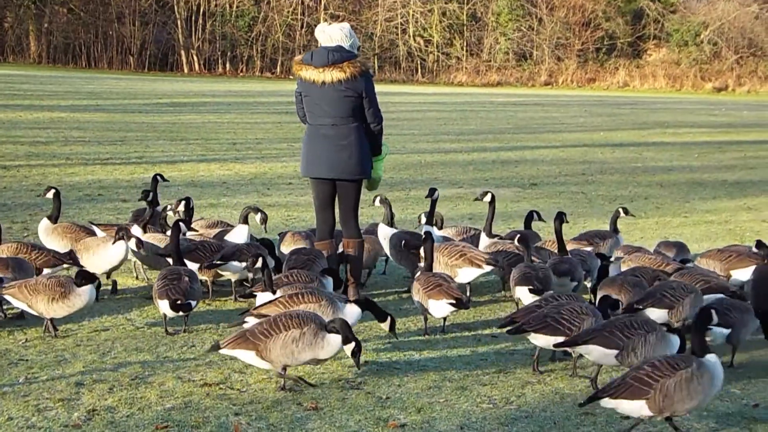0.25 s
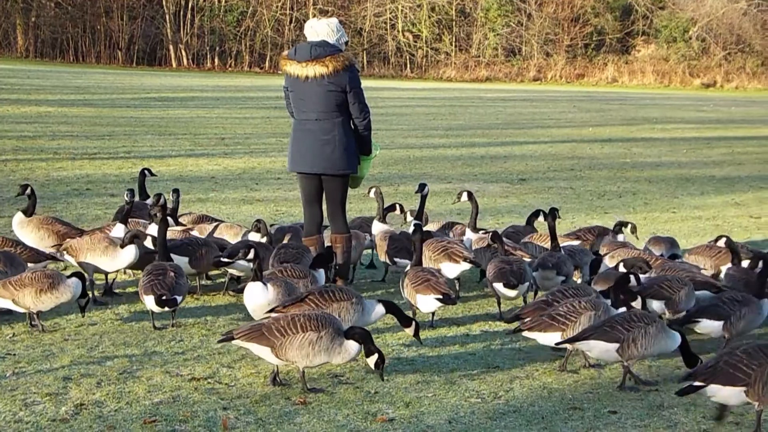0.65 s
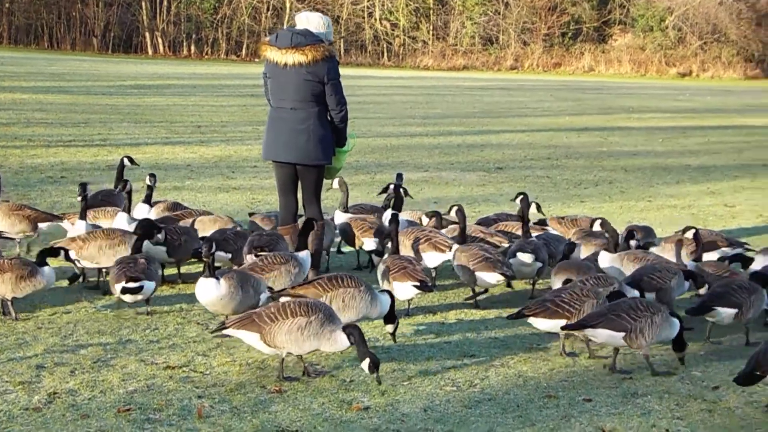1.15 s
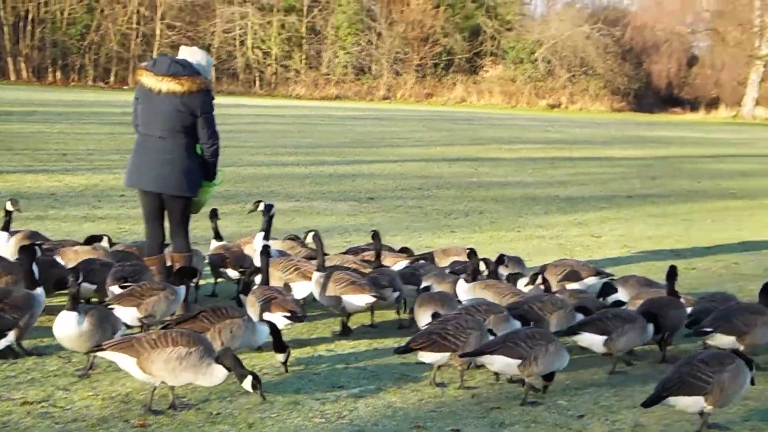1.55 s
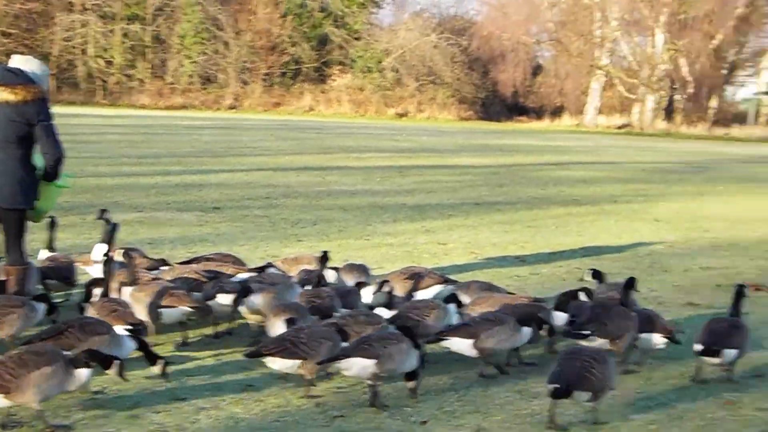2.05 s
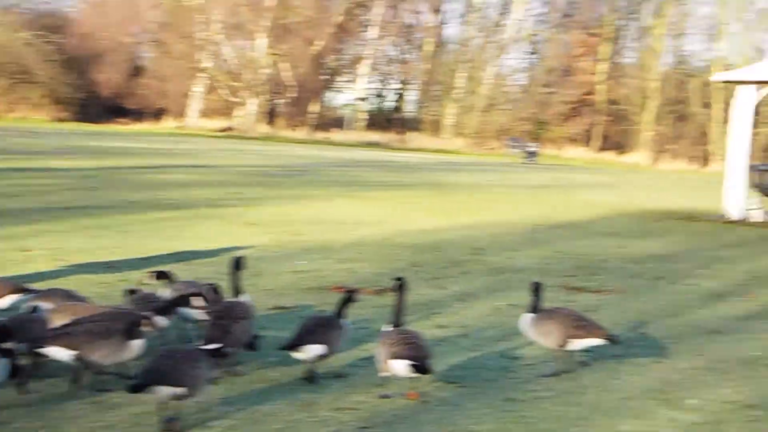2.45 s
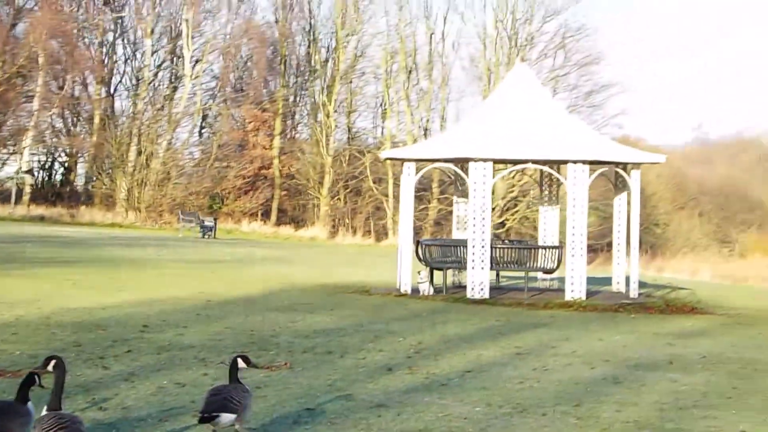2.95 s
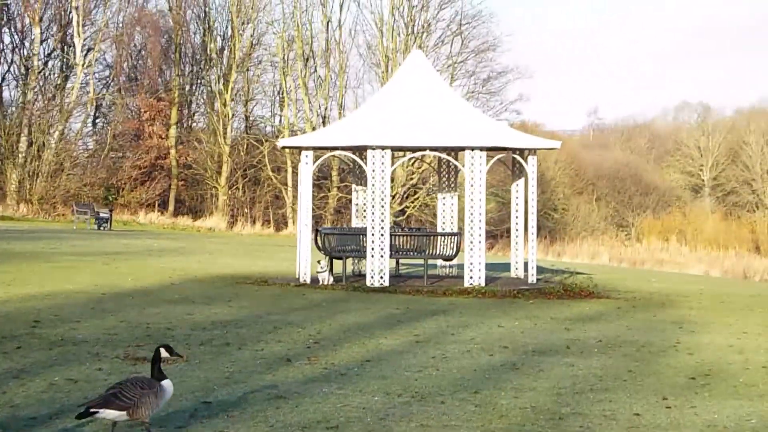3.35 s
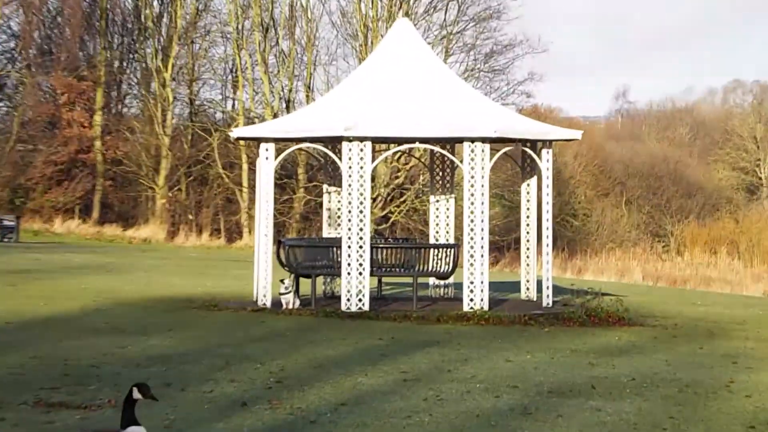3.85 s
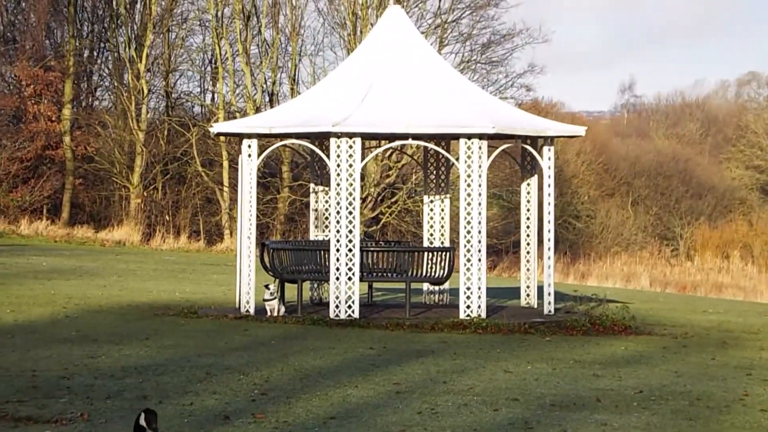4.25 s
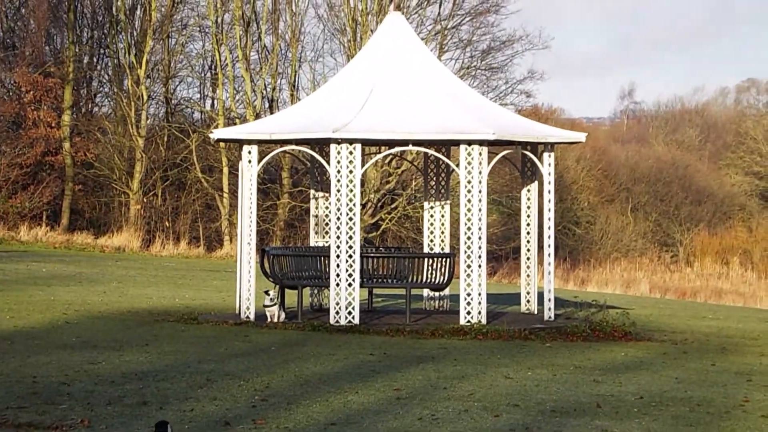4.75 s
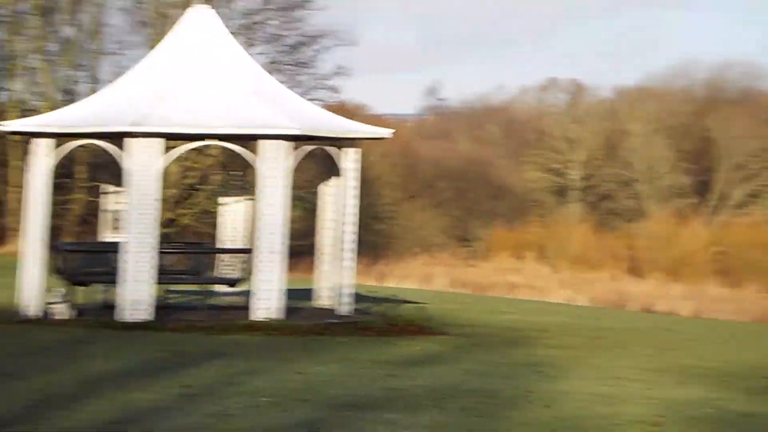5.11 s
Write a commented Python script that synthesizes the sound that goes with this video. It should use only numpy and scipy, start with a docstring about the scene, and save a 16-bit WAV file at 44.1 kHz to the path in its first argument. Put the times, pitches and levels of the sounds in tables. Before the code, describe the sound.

An open lawn with geese close to a handheld camera. Soft crunches and bright ticks come from feet and bills in frosty grass. One bird gives a growling honk, then two rougher honks follow close together, with a faint echo from trees. The crunching stops, a hard click starts a thin lens motor whir, more clicks end it, and only distant traffic and hiss remain.

```python
"""Geese graze on an open lawn: three times a bird growls up into a short, cracked honk, echoed faintly.
Each voice is a rattle of pulses and a sung tone, both ringing a long throat. Bills and feet tick and
crunch in frosty grass, as struck resonances and spiky noise, over coloured noise for distant traffic and hiss.
A camera's zoom lever clicks and its lens motor whirs for half a second as noise ringing the lens barrel,
while the background dips; a thin rustle comes and goes on top."""
import sys
import numpy as np
from scipy import signal
from scipy.fft import rfft, irfft, next_fast_len
from scipy.io import wavfile

SR = 44100
rng = np.random.default_rng(int(sys.argv[2]) if len(sys.argv) > 2 else 0)


def bounce(signal):
    """Save signal as a 16-bit WAV file at the path given by the first command-line argument."""
    frames = np.transpose(np.atleast_2d(signal))
    limited = np.clip(frames, -1, 1)
    pcm = np.round(limited * 32767).astype(np.int16)
    wavfile.write(sys.argv[1], SR, pcm)


N = 237147
TIME = np.arange(N) / SR
FREQ = np.maximum(np.arange(N // 2 + 1) * SR / N, 1)


def undb(db):
    """Decibels to gain."""
    return 10 ** (np.asarray(db) / 20)


def unit(x):
    """Scale to rms 1."""
    return x / np.sqrt(np.mean(x ** 2) + 1e-18)


def colour(points, hz=FREQ):
    """Gain of a spectrum drawn through (freq_hz, level_db) points on a log frequency axis."""
    f, db = np.transpose(points)
    return undb(np.interp(np.log(hz), np.log(f), db))


def resonances(modes, hz, order=1):
    """Complex response of parallel resonances of alternating sign; order 2 has steep skirts."""
    total = 0
    for k, (f, width, db) in enumerate(modes):
        detuning = (hz / f - f / hz) * f / width
        total = total + (-1) ** k * undb(db) / (1 + 1j * detuning) ** order
    return total


def filtered(x, response):
    """Pass a sound through a response given as a function of frequency."""
    size = next_fast_len(x.shape[-1] + 2048)  # spare room for the ring-out
    hz = np.maximum(np.arange(size // 2 + 1) * SR / size, 1)
    return irfft(rfft(x, size) * response(hz), size)[..., :x.shape[-1]]


def walk(rate_hz, size=N):
    """Smooth random wander of rms 1, with little movement faster than the rate."""
    return unit(filtered(rng.standard_normal(size), lambda hz: np.exp(-(hz / rate_hz) ** 2)))


def held(t, start, length, attack, release):
    """Envelope in dB: a rise up to the start, a hold at 0, a fall; attack and release each span 60 dB."""
    before = np.maximum(start - t, 0)
    after = np.maximum(t - start - length, 0)
    return -60 * (before / attack + after / release)


def add(out, start, sound):
    """Mix a sound in at a time."""
    i = int(start * SR)
    out[:, i:i + sound.shape[-1]] += sound[..., :N - i]


# stereo spread of noise beds: freq_hz, side_minus_mid_db
WIDTH = [(40, -15), (120, -16.5), (300, -24.5), (1200, -19), (2400, -13.5), (4400, -9), (8000, -3.5),
         (13000, -48)]


def wash(response, width=WIDTH):
    """Stereo noise of a given colour; independent side noise sets how wide each band sounds."""
    mid = filtered(rng.standard_normal(N), response)
    side = filtered(rng.standard_normal(N), lambda hz: response(hz) * colour(width, hz))
    return unit(np.array([mid + side, mid - side]))


# colour of far tyre noise: freq_hz, level_db
TRAFFIC = [(180, -59), (300, -16), (336, -10), (372, -14.5), (467, -12.5), (585, -9.5), (734, -3.5),
           (1010, 0), (1550, -3.5), (1860, -5), (2550, -8.5), (3240, -13.5), (4500, -20.5), (5850, -26),
           (9900, -120)]
# colour of low road rumble: freq_hz, level_db
RUMBLE = [(20, -44), (50, -10.5), (100, -7), (180, 0), (300, -1.5), (450, -12), (800, -51)]
# colour of the fine hiss: freq_hz, level_db
HISS = [(2000, -15), (3500, -4), (5300, 4), (6600, -2.5), (8000, -12.5), (10000, -19.5), (13000, -22),
        (16000, -26)]
# levels at the start, and their growth as the traffic draws nearer
TRAFFIC_DB, TRAFFIC_DB_PER_S = -42, 0.58
RUMBLE_DB, RUMBLE_DB_PER_S = -61, 0.75
DRONE_DB, DRONE_DB_PER_S = -71, 3
HISS_DB = -48.5
DIP_START_S, DIP_LENGTH_S, DIP_EDGE_S, DIP_DB = 3.437, .856, .015, -3


def background():
    """Noise for far tyres and rumble and a narrow engine drone swell over a fine hiss; all dips once."""
    traffic_db = TRAFFIC_DB + TRAFFIC_DB_PER_S * TIME + 0.43 * walk(26)
    traffic = wash(lambda hz: colour(TRAFFIC, hz)) * undb(traffic_db)
    rumble = wash(lambda hz: colour(RUMBLE, hz)) * undb(RUMBLE_DB + RUMBLE_DB_PER_S * TIME)
    drone = wash(lambda hz: resonances([(247.9, 34, 0)], hz, order=2))
    drone = drone * undb(DRONE_DB + DRONE_DB_PER_S * TIME)
    hiss = wash(lambda hz: colour(HISS, hz)) * undb(HISS_DB + .5 * walk(18))
    dip = undb(held(TIME, DIP_START_S, DIP_LENGTH_S, DIP_EDGE_S, DIP_EDGE_S))  # 0 to 1
    return (traffic + rumble + drone + hiss) * undb(DIP_DB * dip)


def feet(count=60, step_db=-47, spread_db=3, crunch_s=0.042):
    """Webbed feet crush frost at random moments early on; cubed noise makes spiky, crystalline crunches."""
    out = np.zeros((2, N))
    t = TIME[:SR // 10]
    for when, size, pan in rng.random((count, 3)):
        crystals = rng.standard_normal(len(t)) ** 3 * np.exp(-t / crunch_s) / 20
        level_db = step_db - spread_db * np.log(1 - size)  # mostly soft, a few heavy
        add(out, 3.3 * when, undb(level_db) * np.outer([.5 + pan, 1.5 - pan], crystals))
    return filtered(out, lambda hz: 1 / (1 + (3500 / hz) ** 4) / (1 + (hz / 12000) ** 2))


def snap(ring_hz, t60, width, thud_db, top_hz, apart=1.0):
    """A sharp contact and its dying crackle ring a small, stiff body; peak near 1."""
    t = TIME[:SR // 10]
    grit = rng.standard_normal(len(t)) + apart * rng.standard_normal((2, len(t)))  # shared + per side
    force = grit * undb(-60 * t / t60) + 4 * (t == 0)
    modes = [(1100, 900, thud_db), (ring_hz, width, 0), (5700, 1400, -8)]
    sound = filtered(force, lambda hz: resonances(modes, hz) / (1 + (hz / top_hz) ** 10))
    return sound / (2.62 * np.std(sound[:, :int(t60 * SR / 5)]))


# crisp ticks and plucks in the grass: start_s, peak_db (approximate), ring_hz, t60_s
TICKS = [(.34, -34, 7300, 0.024), (0.3453, -28.5, 5850, 0.063), (.373, -38, 5840, 0.022),
         (0.381, -34, 7600, 0.027), (0.381, -29, 5400, 0.036), (2.2747, -29, 5400, 0.022),
         (2.279, -30, 7800, .02), (2.638, -30.5, 6000, 0.014), (3.0296, -31, 5600, 0.012),
         (3.299, -35, 6000, .01)]


def grass_ticks():
    """Bills and feet snap stiff blades, each a broad, bright resonance struck once."""
    out = np.zeros((2, N))
    for s, db, hz, t60 in TICKS:
        add(out, s, undb(db) * snap(hz, t60, width=1600, thud_db=-9.5, top_hz=8800))
    return out


GROWL_ATTACK_S, SWELL_DB, GROWL_RELEASE_S = .07, 8.5, 0.029
CRACK_ATTACK_S, CRACK_RELEASE_S = 0.044, 0.052
HONK_ATTACK_S, HONK_FADE_DB_PER_S, HONK_RELEASE_S = 0.0128, 230, 0.044
# share of the pitch gained over the growl, mostly late, and lost per second afterwards
TENSION_RISE, SAG_PER_S = .075, 2.8
LOCK_S, HONK_ROUGH = .022, .04  # the pulses fall into step just before the break
BRIGHT_S = 0.012  # half length of the bright flash at the height of the crack


def effort(t, growl, crack, honk, peak_s):
    """A bird pushes harder through the growl: level and pitch climb until the voice breaks, then sag."""
    start, rattle_db, tone_db, rough, rate, pitch, first_db, last_db = growl
    break_s, crack_length, crack_db, flash_db = crack
    honk_s, honk_length, honk_hz, honk_db = honk
    to_go = np.clip((break_s - t) / (break_s - start), 0, 1)  # 1 at the start, 0 at the break
    tension = 1 - TENSION_RISE * (1 - (1 - to_go) ** 2) - SAG_PER_S * np.maximum(t - peak_s, 0)

    swell = held(t, start, break_s - start, GROWL_ATTACK_S, GROWL_RELEASE_S) - SWELL_DB * to_go
    cracked = crack_db + held(t, break_s, crack_length, CRACK_ATTACK_S, CRACK_RELEASE_S)
    sung = honk_db + held(t, honk_s, honk_length, HONK_ATTACK_S, HONK_RELEASE_S)
    sung = sung - HONK_FADE_DB_PER_S * np.maximum(t - honk_s, 0)

    # the pitch jumps to the honk once that is the louder tone
    honking = (t > break_s - LOCK_S) & (sung > tone_db + swell)
    pitch = np.where(honking, honk_hz * (1 - SAG_PER_S * (t - honk_s)), pitch * tension)
    rough = np.interp(t, [break_s - LOCK_S, break_s], [rough, HONK_ROUGH])
    flash = 1 / (1 + ((t - peak_s) / BRIGHT_S) ** 4)
    bright_db = last_db + (first_db - last_db) * to_go + (flash_db - last_db) * flash
    rattle_db = np.maximum(rattle_db + swell, cracked)
    tone_db = np.maximum(tone_db + swell, sung)
    return rate * tension, rattle_db, rough, pitch, tone_db, bright_db


def goose(call, throat, peak_s, tone_bright_db, rasp_db, waver, jitter=.28, scatter_db=2.0):
    """The syrinx rattles in slow pulses and sings a tone above them; both ring the long throat."""
    growl, crack, honk = call
    t = np.arange(growl[0] - GROWL_ATTACK_S, honk[0] + honk[1] + HONK_RELEASE_S, 1 / SR)
    rate, rattle_db, rough, pitch, tone_db, bright_db = effort(t, growl, crack, honk, peak_s)

    # the pulses are ragged in the growl and lock into step around the crack; one lands on the peak
    turns = np.cumsum(rate) / SR
    turns = turns - np.interp(peak_s, t, turns)
    cycles = np.arange(np.ceil(turns[0]), turns[-1])
    late, loud = rng.standard_normal((2, len(cycles)))
    loose = np.interp(cycles, turns, rough)
    at = np.interp(cycles + jitter * loose * late, turns, np.arange(len(t))).astype(int)
    pulses = np.zeros(len(t))
    pulses[at] = undb(scatter_db * loose * loud)
    # air rasps through after each opening
    air = np.exp(-(turns % 1) / (0.44 + rough)) * rng.standard_normal(len(t))
    pulses, air = unit(pulses), unit(air)

    def tract(hz):
        return resonances(throat, hz, order=2)

    def upper(hz):
        return 1 / (1 + (2700 / hz) ** 6)

    # the growl is breathy throughout; in the honk it is mainly the top that still rasps
    body = filtered(pulses + rough * air, lambda hz: tract(hz) * (1 - upper(hz)))
    edge = filtered(pulses + (rough + undb(rasp_db)) * air, lambda hz: tract(hz) * upper(hz))
    # sharper closing of the membranes wakes the upper resonances
    rattle = (body + edge * undb(bright_db)) / np.std(body)

    wavering_pitch = pitch * (1 + waver * rough * walk(96)[:len(t)])
    phase = 2 * np.pi * np.cumsum(wavering_pitch) / SR
    k = np.arange(1, 17)[:, None]  # harmonic numbers
    partials = tract(k * pitch) * undb((tone_bright_db + bright_db) * upper(k * pitch))
    tone = np.real(partials * np.exp(1j * k * phase)).sum(0)
    tone = tone / np.sqrt((abs(partials) ** 2).sum(0) / 2)
    return t[0], rattle * undb(rattle_db) + tone * undb(tone_db)


def wood_echo(calls):
    """The edge of the wood scatters the calls back as a faint, diffuse tail of decaying noise."""
    t = TIME[:SR]
    decay = undb(-60 * t / 1.1) * (1 - np.exp(-t / .04))  # t60 1.1 s, soft onset
    trees = rng.standard_normal((2, SR)) * decay
    return undb(-35) * signal.fftconvolve(calls, unit(trees) / np.sqrt(SR), axes=1)[:, :N]


# throat resonances of the three calls: freq_hz, width_hz, level_db
BROAD_THROAT = [(590, 120, -12.5), (840, 250, -7), (1170, 230, 2.5), (1383, 150, 6.5), (1720, 400, 1),
                (4240, 1500, -10), (4880, 270, -11), (5500, 230, -7)]
NASAL_THROAT = [(695, 270, -13.5), (1160, 340, -7), (1384, 370, 2), (1870, 110, -10), (2700, 1000, -22),
                (4570, 340, -14.5), (5400, 1100, -20), (6760, 1300, -30.5), (8300, 1000, -35)]
OPEN_THROAT = [(442, 130, -13.5), (770, 710, -14), (1160, 410, -1), (1484, 460, 2.5), (3650, 790, -17),
               (5220, 1140, -13), (5900, 1200, -17), (7600, 960, -27)]
# a call growls, breaks in a crack of hard pulses and ends in a sung honk; one row per call in each table
# growls, with levels, rate and pitch as reached at the break: start_s, rattle_db, tone_db,
# roughness (0-1), rattle_rate_hz, tone_pitch_hz, first_brightness_db, last_brightness_db
GROWLS = [(.9, -42, -35, 0.18, 205, 408.7, 0, -8), (1.882, -34, -35, 0.76, 170.4, 692, -5, -4),
          (2.126, -32, -34, .7, 154.4, 687.6, -12, 2)]
# cracks: start_s, length_s, level_db, brightness_db
CRACKS = [(1.065, 0.015, -30, 2), (2.0033, 0.014, -25.5, 6.5), (2.247, 0.0062, -24, 0)]
# honks, with pitch and level at the start: start_s, length_s, pitch_hz, level_db
HONKS = [(1.079, 0.039, 589, -27), (2.002, 0.023, 719, -21), (2.255, .018, 728, -27)]


def flock():
    """Three calls, each through its own throat shape, with their echo."""
    out = np.zeros((2, N))
    first, second, third = zip(GROWLS, CRACKS, HONKS)
    add(out, *goose(first, BROAD_THROAT, peak_s=1.0815, tone_bright_db=0.5, rasp_db=-5, waver=0.0057))
    add(out, *goose(second, NASAL_THROAT, peak_s=2.0185, tone_bright_db=-7.5, rasp_db=-9, waver=0.0196))
    add(out, *goose(third, OPEN_THROAT, peak_s=2.2488, tone_bright_db=-4.0, rasp_db=-1, waver=0.02))
    return out + wood_echo(out)


# faint, high rustles: start_s, length_s, level_db
RUSTLES = [(2.6, 0.29, -68), (5.07, .3, -70)]
RUSTLE_HZ, RUSTLE_WIDTH_HZ, RUSTLE_EDGE_S = 9900, 1800, .25


def rustles():
    """A thin rustle, one band of resonant noise, comes and goes at the top of the hiss."""
    level = np.zeros(N)
    for s, length, db in RUSTLES:
        level += undb(db + held(TIME, s, length, RUSTLE_EDGE_S, RUSTLE_EDGE_S))
    return level * wash(lambda hz: resonances([(RUSTLE_HZ, RUSTLE_WIDTH_HZ, 0)], hz, order=2))


# clicks of the zoom lever and lens barrel: start_s, peak_db (approximate), ring_hz, t60_s, thud_db
CLICKS = [(3.3645, -17.5, 3050, 0.0095, -6), (3.4555, -32, 4000, .04, -23),
          (3.763, -21.5, 2450, 0.0092, -13), (3.963, -24, 3650, 0.064, -32), (3.977, -31, 3570, 0.029, -27)]


def zoom_clicks():
    """Small hard parts knock together inside the camera, with a narrower ring than the grass."""
    out = np.zeros((2, N))
    for s, db, hz, t60, thud_db in CLICKS:
        add(out, s, undb(db) * snap(hz, t60, width=420, thud_db=thud_db, top_hz=6450))
    return out


# colour of the motor's rubbing: freq_hz, level_db
MOTOR_COLOUR = [(1530, -23.5), (2600, -13.5), (2730, -15.5), (3420, -1.5), (4380, -0.5), (4830, -2),
                (6450, -8.5), (7640, -10), (8490, -12.5), (9170, -12.5), (11100, -30), (12200, -30),
                (14000, -41)]
# stereo spread of the motor: freq_hz, side_minus_mid_db
MOTOR_WIDTH = [(2800, -1), (3400, -9), (3900, 8), (4500, -6), (5700, 1), (6200, -6), (6600, 1), (7500, -5),
               (8600, -6), (10000, 2)]
# lens barrel resonances: freq_hz, width_hz, level_db
BARREL = [(3470, 220, -6), (4050, 89, 0), (4700, 190, -0.5), (5100, 120, -1.5), (5590, 350, -4.5),
          (6830, 100, -9), (7160, 250, -5.5), (7740, 110, -2), (9070, 250, -18), (11800, 400, -30)]
# the level rises up to the start, surges briefly, holds and falls away
MOTOR_START_S, MOTOR_RUN_S, MOTOR_DB = 3.456, 0.496, -36
MOTOR_ATTACK_S, MOTOR_RELEASE_S, SURGE_DB, SURGE_S = 0.031, 0.12, 2.5, 0.049


def lens_motor(mesh_hz=187, mesh_depth=0.2, grain_db=-1.1):
    """Gear teeth scrape and ring the lens barrel, which shakes each microphone in its own way."""
    mesh_rate = mesh_hz * (1 + 0.06 * walk(14.9))
    teeth = 1 + mesh_depth * np.cos(2 * np.pi * np.cumsum(mesh_rate) / SR)
    rub = wash(lambda hz: colour(MOTOR_COLOUR, hz), MOTOR_WIDTH) * teeth * undb(grain_db * walk(440))
    ring = wash(lambda hz: resonances(BARREL, hz, order=2), MOTOR_WIDTH)
    running = held(TIME, MOTOR_START_S, MOTOR_RUN_S, MOTOR_ATTACK_S, MOTOR_RELEASE_S)
    surge = SURGE_DB * np.exp(-np.maximum(TIME - MOTOR_START_S, 0) / SURGE_S)
    return (rub + undb(-3.0) * ring) * undb(MOTOR_DB + running + surge)


def scene():
    """Everything together; the left microphone is a little more sensitive."""
    left_db = 0.52
    lawn = background() + feet() + grass_ticks() + flock() + rustles()
    camera = zoom_clicks() + lens_motor()
    return (lawn + camera) * undb([[left_db], [-left_db]])


TOP_HZ = 15800


def record(dry):
    """The camera cuts the top with a steep low-pass."""
    return signal.sosfilt(signal.ellip(10, .1, 80, TOP_HZ, fs=SR, output="sos"), dry)


dry = scene()
out = record(dry)
bounce(out)
```